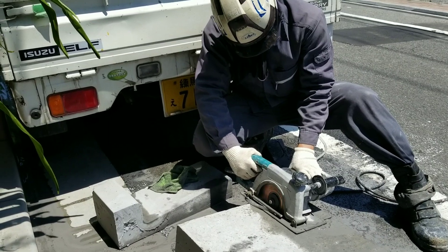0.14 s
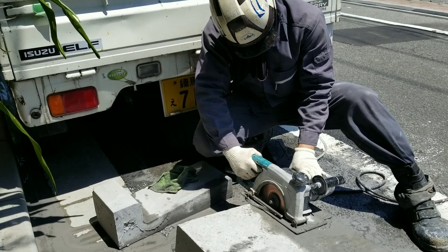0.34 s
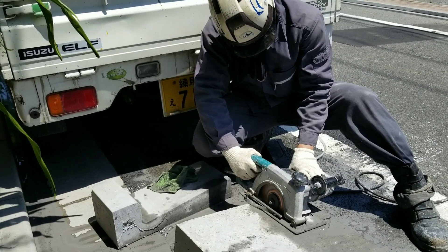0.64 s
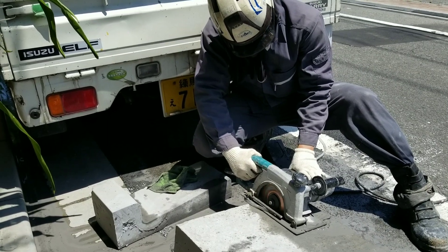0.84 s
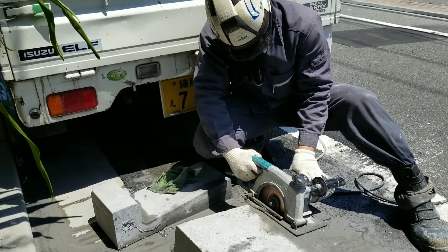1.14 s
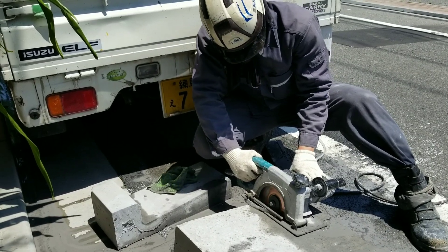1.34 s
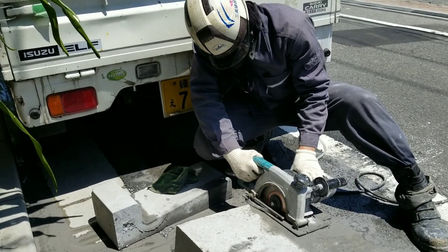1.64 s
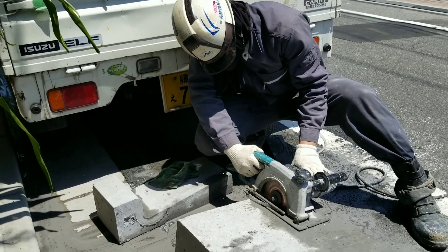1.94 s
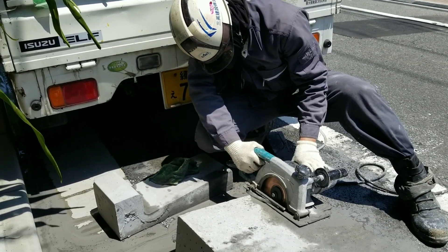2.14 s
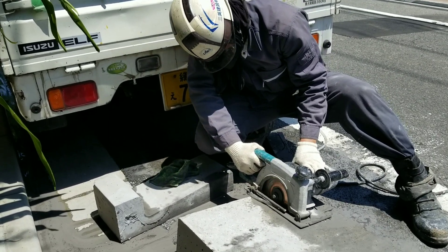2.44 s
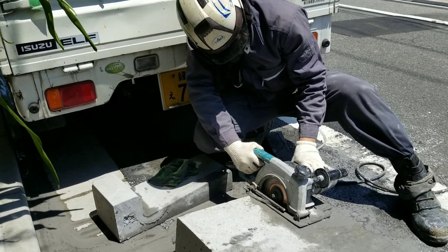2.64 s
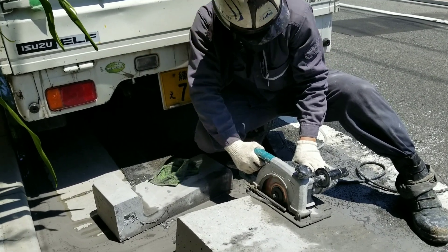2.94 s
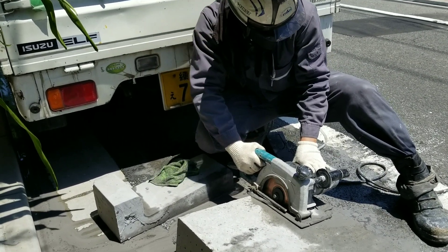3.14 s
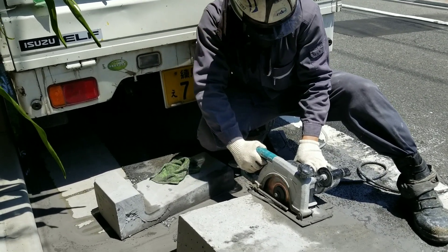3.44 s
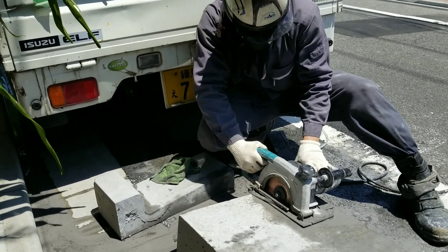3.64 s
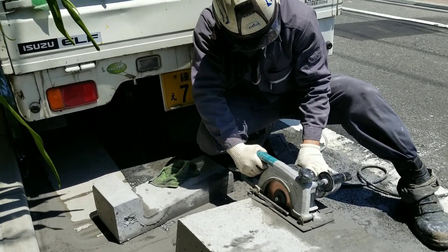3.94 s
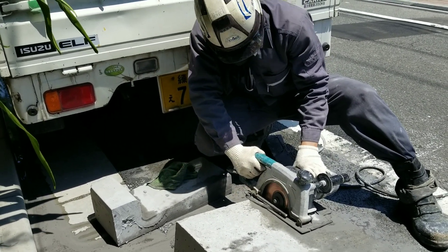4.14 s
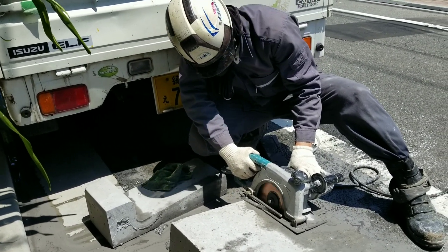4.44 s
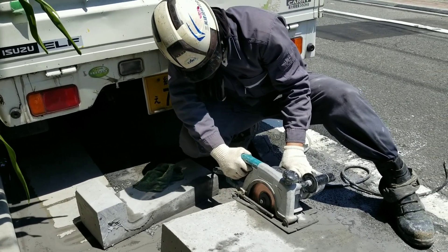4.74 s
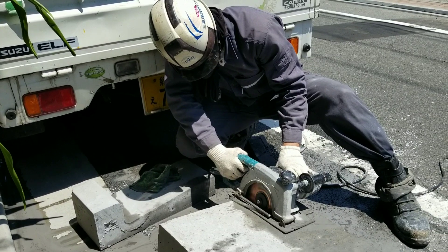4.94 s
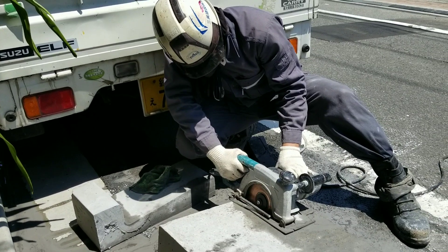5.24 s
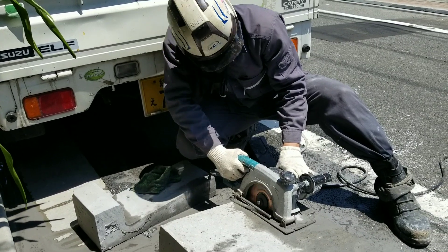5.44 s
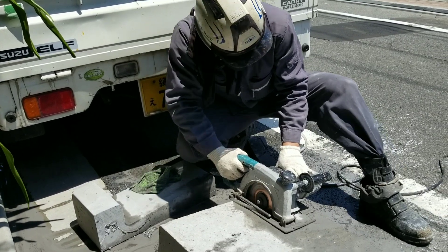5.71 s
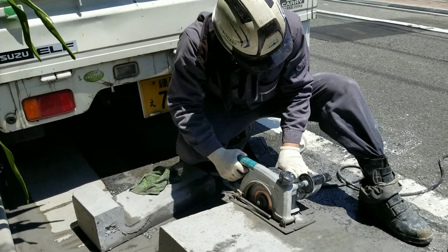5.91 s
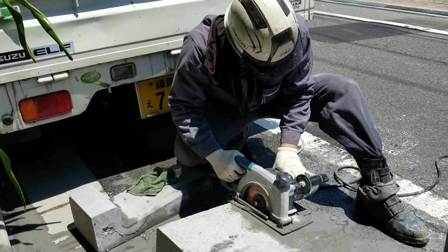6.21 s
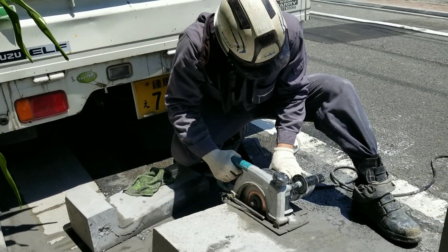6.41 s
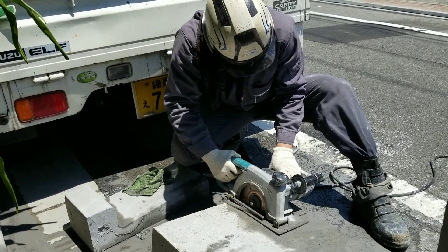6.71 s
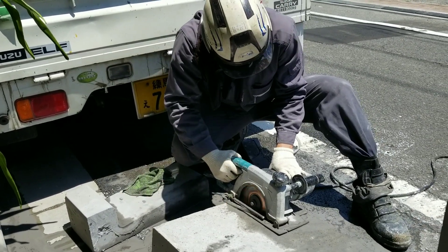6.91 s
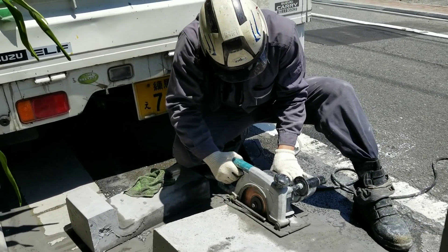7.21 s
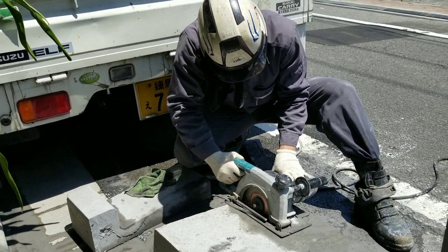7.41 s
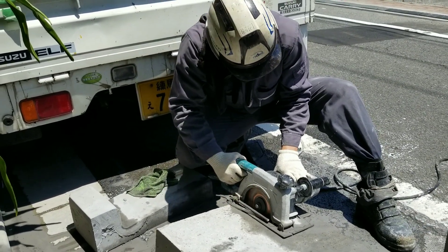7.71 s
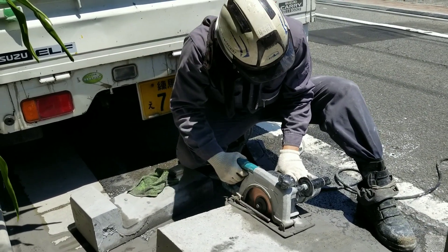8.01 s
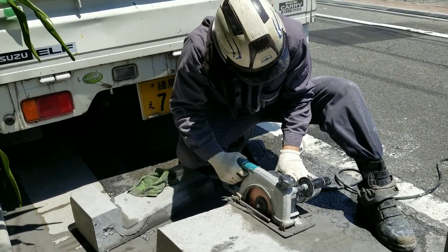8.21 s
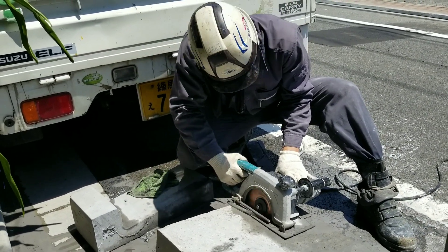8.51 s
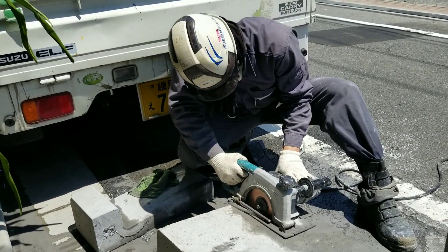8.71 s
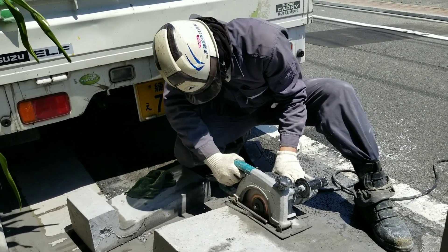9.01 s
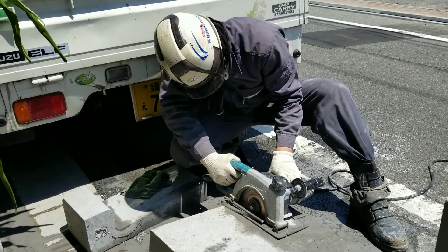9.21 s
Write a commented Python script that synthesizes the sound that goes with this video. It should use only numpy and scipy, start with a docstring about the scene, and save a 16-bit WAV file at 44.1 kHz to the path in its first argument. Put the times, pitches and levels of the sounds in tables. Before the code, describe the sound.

Close, harsh concrete cutting with a power saw: gritty grinding and gear whine dip as the trigger eases, then surge upward over generator chugging.

```python
"""By a road, a handheld electric saw grinds into a concrete block close to a two-port stereo microphone.
It cuts until 2.0 s; the trigger is eased, the motor sags, then pulls up again when pressed at 2.5 s.
Two short easings follow near 4.4 and 4.7 s, a longer one from 5.8 to 6.3 s, and the whine ends climbing.
Gears and fan whine with the speed, mains torque knocks the gears, and rim and rough noise ring guard and blade.
Behind, a small petrol generator fires into its exhaust and sags after each new press of the trigger."""
import sys
import numpy as np
from scipy import signal
from scipy.fft import rfft, irfft, next_fast_len
from scipy.io import wavfile
from scipy.ndimage import uniform_filter1d

SR = 44100
rng = np.random.default_rng(int(sys.argv[2]) if len(sys.argv) > 2 else 0)


def wrap_up_sound(samples):
    """Save the sound to the file named by the first command line argument, as 16-bit audio."""
    columns = np.atleast_2d(samples).T
    # keep every value between -1 and 1, then stretch to whole-number steps
    tamed = np.clip(columns, -1, 1)
    steps = np.round(tamed * 32767).astype(np.int16)
    wavfile.write(sys.argv[1], SR, steps)


N = 412776
T = np.arange(N) / SR  # seconds

PINION_TEETH, WHEEL_TEETH, FAN_BLADES, SEGMENTS = 8, 49, 12, 16  # counts
TORQUE_HZ = 99.95  # torque peaks, two a mains cycle

# Saw motor, before lift and waver of the tone: start_s, mesh_pitch_hz, mesh_level_db
MOTOR_SPEED = [(0.0, 2163, -33), (0.8, 2008, -32), (1.2, 1966, -32), (2.0, 1916, -35), (2.06, 1762, -27),
               (2.14, 1610, -29), (2.28, 1345, -33), (2.38, 1150, -25), (2.42, 1105, -22),
               (2.47, 1076, -24), (2.49, 1107, -43), (2.54, 1310, -51), (2.65, 1490, -45),
               (2.75, 1615, -40), (2.9, 1775, -36), (3.1, 1925, -35), (3.35, 1985, -33), (3.7, 1914, -31),
               (3.9, 1914, -30), (4.05, 1966, -30), (4.2, 2080, -31), (4.32, 2195, -25), (4.43, 2085, -29),
               (4.58, 1770, -33), (4.7, 1760, -40), (4.76, 1680, -30), (4.86, 1580, -36), (4.93, 1790, -30),
               (5.03, 1968, -27), (5.2, 2205, -26), (5.3, 2099, -36), (5.45, 1900, -31), (5.68, 1850, -36),
               (5.81, 1600, -40), (6.03, 1308, -38), (6.07, 1295, -30), (6.22, 1190, -31),
               (6.34, 1083, -31), (6.38, 1245, -42), (6.5, 1742, -30), (6.62, 1945, -26), (6.69, 2045, -23),
               (6.86, 2237, -25), (6.95, 2295, -22), (7.05, 2335, -23), (7.12, 2290, -33), (7.3, 2080, -35),
               (7.5, 1980, -30), (7.62, 1948, -29), (7.75, 1930, -28), (7.88, 1968, -27), (8.0, 2056, -35),
               (8.15, 2205, -36), (8.28, 2360, -26), (8.42, 2475, -34), (8.6, 2588, -26), (8.72, 2635, -34),
               (8.9, 2695, -31), (9.36, 2780, -35)]
# Lean of grinding and grit across the ports, used about its mean: start_s, left_minus_right_db
STEREO_LEAN = [(0.0, 11.5), (2.8, 9.5), (4.8, 11.5), (6.3, 10.5), (6.6, 11), (9.36, 12.5)]


def saw():
    """Motor speed turns the gears and blade; mains torque and the blade's high spot drive the noises."""
    mesh_hz, mesh_db = curves(MOTOR_SPEED)
    tones_db = tones(mesh_hz, mesh_db)
    rattle_db, guard_db, grind_db, hiss_db = pressure()
    lean_db, = curves(STEREO_LEAN)
    mesh = np.cumsum(mesh_hz) / SR
    turns = spin(mesh)

    # the slower the blade, the harder it catches as the high spot comes round
    catch = np.clip(1.1 - mesh_hz / 2400, .1, 1)
    high_spot = np.cos(2 * np.pi * turns) + 0.84 * np.cos(4 * np.pi * turns + 1.1)
    catch_db = catch * high_spot
    # the bowed disc bites the sides of the cut twice a turn
    bite = beat(2 * turns, 2.1, 3.1)
    flicker = undb(0.73 * walk(30))

    # each torque peak knocks the gear play shut, hardest under load
    torque = TORQUE_HZ * T + .22 + 0.027 * walk(40)
    knock = beat(torque, 4.2, 1.2)
    load = np.clip((rattle_db + 38) / 9, 0, 1)
    loaded_knock = load * knock
    # each blow gets a random sign, so the knocks rasp without a steady pitch
    blow_sign = rng.choice([-1, 1], int(torque[-1]) + 2)[torque.astype(int)]
    blows = load * blow_sign * clicks(torque, 1.2)
    # the gaps between the rim segments tick past, weaker under load
    rough = rim(turns, 0.907)
    scrape = rough + (3.0 - 1.5 * load) * clicks(SEGMENTS * turns, 3.0)

    rattle = gear_rattle(turns, flicker, load, loaded_knock, blows, rough) * undb(rattle_db)
    guard = guard_noise(flicker, catch_db, loaded_knock, blows, scrape) * undb(guard_db)
    guard = guard + guard_sing(blows, scrape)
    grind = grinding(flicker, catch_db, bite, loaded_knock, blows, scrape) * undb(grind_db - 3.0)
    grind = grind + blade(rng.standard_normal(N) + 8.0 * blows + 1.2 * scrape) * undb(grind_db - 7.0)
    hiss = grit_hiss(high_spot, bite, loaded_knock) * undb(hiss_db)
    lean = (lean_db - lean_db.mean()) * np.array([[.3], [-.7]])
    return rattle + guard + (grind + hiss) * undb(lean) + whine(mesh, mesh_hz, *tones_db)


def whine(mesh, mesh_hz, mesh_db, octave_db, fan_db, hum_db):
    """Gear mesh and octave throb with the blade turn; fan blades and armature hum run beside them."""
    armature = 2 * np.pi * mesh / PINION_TEETH
    turn = 2 * np.pi * spin(mesh)
    # the faster the gears, the more unevenly the teeth meet, and part of the tone spreads into a rough band
    uneven = (mesh_hz.clip(None, 2250) / 2200) ** 2
    random_wobble = .3 * walk(200) + .4 * walk(45)
    turn_wobble = .3 * np.sin(turn + 1.5) + .55 * np.sin(2 * turn)
    wobble = uneven * (random_wobble + turn_wobble)  # radians
    # the teeth press hardest while the high spot of the blade is in the cut, more so when slow
    throb_depth_db = (12.5 - mesh_hz / 190).clip(1)
    throb = undb(throb_depth_db * np.cos(turn) + .8 * walk(60))
    # the pinion runs out of true, which sets strands beside the mesh tone
    throb = throb * (1 + .3 * uneven * walk(400) + .55 * uneven * np.cos(armature))
    # hold the running rms at 1
    throb = throb / np.sqrt(uniform_filter1d(throb ** 2, size=SR // 4))

    # (cycles per armature turn, level, swell, phase drift)
    voices = [(PINION_TEETH, mesh_db, throb, wobble), (2 * PINION_TEETH, octave_db, throb, wobble),
              (FAN_BLADES, fan_db, 1, 0.49 * wobble), (1, hum_db, 1, 0)]
    out = 0
    for order, db, swell, drift in voices:
        tone = np.sqrt(2) * np.sin(order * armature + drift)
        out = out + undb(db) * panned(mesh_hz * order / PINION_TEETH) * swell * tone
    return out


# Octave of the mesh tone, before waver: start_s, level_db
OCTAVE_LEVEL = [(0.0, -46), (2.0, -47), (2.08, -39), (2.2, -35), (2.34, -33), (2.42, -27), (2.47, -30),
                (2.54, -46), (3.3, -43), (3.6, -47), (6.0, -46), (6.15, -43), (6.33, -37), (6.42, -47),
                (6.66, -45), (6.8, -36), (6.95, -40), (7.1, -47), (9.36, -50)]
GUARD_LIFT_HZ, GUARD_LIFT_WIDTH_HZ, GUARD_LIFT_DB = 1086, 14, 2  # a mesh tone passing here is lifted
COWL_HZ, COWL_WIDTH_HZ = 2330, 520  # the cowl favours the fan tone here
FAN_DB, FAN_SURGE_DB = -41, 11
HUM_DB, HUM_DB_PER_KHZ, HUM_REFERENCE_HZ = -55, 8, 2000  # HUM_DB holds at this mesh rate
TONE_WAVER_DB = 1.8


def tones(mesh_hz, mesh_db):
    """Levels of mesh tone, octave, fan and hum: the fan sings on restart, the hum grows with speed."""
    khz_above = (mesh_hz - HUM_REFERENCE_HZ) / 1000
    off_guard = 2 * (mesh_hz - GUARD_LIFT_HZ) / GUARD_LIFT_WIDTH_HZ
    lift_db = GUARD_LIFT_DB / (1 + off_guard ** 2)
    sag_hz = trigger()[1]
    fan_hz = mesh_hz * FAN_BLADES / PINION_TEETH
    off_cowl = 2 * (fan_hz - COWL_HZ) / COWL_WIDTH_HZ
    surge = np.clip(sag_hz, 0, 1) / (1 + off_cowl ** 4)
    levels = (mesh_db + lift_db, curves(OCTAVE_LEVEL)[0],
              FAN_DB + FAN_SURGE_DB * surge, HUM_DB + HUM_DB_PER_KHZ * khz_above.clip(None, .1))
    return [db + TONE_WAVER_DB * walk(17) for db in levels]


# Pan of tones from the saw: pitch_hz, left_db, right_db
SAW_TONE_PAN = [(300, 2, 2), (1102.6, 1.5, 4.5), (2150, 7, -13), (3050, 9, -12), (3260, -4, -16),
                (3750, 4, -12), (4100, 7, -9)]


def panned(hz):
    """Left and right gain of a tone, set by its pitch."""
    at, *pan_db = np.transpose(SAW_TONE_PAN)
    return undb([np.interp(hz, at, p) for p in pan_db])


# Moments when the high spot of the slowed blade is in the cut: time_s
HIGH_SPOT_TIMES = [2.422, 6.283]


def spin(mesh):
    """Blade turns through the gear ratio, nudged so that the high spot meets the cut at the given times."""
    turns = mesh / WHEEL_TEETH
    at = np.interp(HIGH_SPOT_TIMES, T, turns)
    return turns + 1 + np.interp(T, HIGH_SPOT_TIMES, np.round(at) - at)


# Cutting noises before flutter, coasting and trims (rattle as with the trigger held):
# start_s, rattle_level_db, guard_level_db, grinding_level_db, grit_level_db
CUT_LEVELS = [(0.0, -33, -31, -18.5, -25.5), (0.5, -29, -29, -19, -24), (1.0, -31, -28, -19.5, -24.5),
              (1.1, -26.5, -28.5, -20, -26), (1.95, -28, -26, -18, -22), (2.4, -30.5, -28, -19.5, -23),
              (2.52, -27.5, -26.5, -18, -21.5), (2.6, -24, -23.5, -19.5, -23),
              (2.82, -29.5, -28, -18.5, -23), (2.92, -32, -29, -17.5, -22), (3.02, -29.5, -28, -17, -22),
              (3.16, -31.5, -29, -18.5, -22), (3.6, -27, -28.5, -19.5, -23.5), (4.25, -32, -29, -19, -25),
              (4.5, -39, -35, -20.5, -26.5), (4.62, -33, -29, -20, -27), (4.95, -34, -31.5, -19.5, -26.5),
              (5.78, -35.5, -30, -21.5, -28), (6.3, -38.5, -36, -27.5, -34.5), (6.37, -29, -29, -23, -30),
              (6.51, -31.5, -26.5, -19, -27), (6.65, -34, -28.5, -19.5, -27.5),
              (6.93, -31, -27, -17.5, -25), (7.2, -28, -27, -19, -26.5), (7.43, -26.5, -28, -21.5, -29),
              (7.7, -28.5, -27, -21, -28.5), (8.05, -32.5, -30, -20, -27.5), (8.2, -35.5, -29, -19, -28),
              (9.36, -35, -32.5, -20.5, -28)]
COAST_RATTLE_DB, RATTLE_FLUTTER_DB = -5.5, .8
GUARD_FLUTTER = 0.33  # share of the rattle's flutter that the guard follows


def pressure():
    """Levels of rattle, guard, grinding and grit; the rattle flutters and dies down while the motor coasts."""
    rattle_db, guard_db, grind_db, hiss_db = curves(CUT_LEVELS)
    flutter_db = RATTLE_FLUTTER_DB * walk(16)
    rattle_db = rattle_db + COAST_RATTLE_DB * trigger()[0] + flutter_db
    return rattle_db, guard_db + GUARD_FLUTTER * flutter_db, grind_db, hiss_db


# Gear rattle at the two ports, relative levels: pitch_hz, left_db, right_db, likeness (0-1)
RATTLE_COLOUR = [(365, -36, -30.5, 1), (475, -15.5, -13.5, 0.99), (605, -2, 0, 1), (780, -2.5, 0.5, 0.61),
                 (957, -8, -14, 1), (1129, -19, -8, 0.64)]


def gear_rattle(turns, flicker, load, loaded_knock, blows, rough):
    """Loose gears chatter twice a blade turn; under load the noise bunches into torque knocks."""
    chatter = undb(2.8 * np.cos(4 * np.pi * turns))
    knocking = 1 - .65 * load + 1.3 * loaded_knock
    return gated(flicker * chatter * knocking, RATTLE_COLOUR, 14.0 * blows + .6 * rough)


# Blade guard at the two ports, relative levels: pitch_hz, left_db, right_db, likeness (0-1)
GUARD_COLOUR = [(888, -12.5, -9, 0.98), (937, -15, -14, 0.83), (1088, -1.5, -1.5, 0.92), (1090, -4.5, 0, 1),
                (1114, -2, -5.5, 0.54), (1163, -2.5, -2, 0.61), (1380, -4, -3.5, 0.21),
                (1510, -7.5, -13, 0.35), (1720, -20, -35, .6)]


def guard_noise(flicker, catch_db, loaded_knock, blows, scrape):
    """Gear blows and rim scrape shake the guard, swelling as the blade catches."""
    gate = flicker * undb(4.1 * catch_db) * (1 + 0.38 * loaded_knock)
    return gated(gate, GUARD_COLOUR, 14.0 * blows + 0.64 * scrape)


# The guard's own pitch: start_s, level_db
SING_LEVEL = [(0.0, -52), (1.0, -46), (2.0, -31.5), (2.53, -29), (2.58, -28), (2.86, -26), (2.92, -32.5),
              (3.5, -32.5), (3.7, -51), (5.6, -41.5), (6.3, -48), (6.5, -42), (7.5, -43), (9.36, -45)]
SING_HZ, SING_WIDTH_HZ = 1072, 40


def guard_sing(blows, scrape):
    """Noise, blows and scrape excite the guard's own pitch through two resonances, one wider."""
    push = rng.standard_normal(N) + 10.0 * blows + scrape
    sing = ring(ring(push, SING_HZ, SING_WIDTH_HZ), SING_HZ, 2.3 * SING_WIDTH_HZ)
    return unit(panned([SING_HZ]) * sing) * undb(curves(SING_LEVEL)[0])


# Grinding at the two ports, relative levels: pitch_hz, left_db, right_db, likeness (0-1)
GRIND_COLOUR = [(1373, -5, -51, 0.76), (1664, -7, -14, 0.35), (1830, -1, -16, 0.27), (2160, 1, -15, 0.42),
                (2270, -4, -22, 0.41), (3095, -4.5, -14.5, 0.43), (3160, -14.5, -22, 0.17),
                (3780, -10, -12, 0.3), (4620, -6.5, -17, 1), (5593, -19, -10.5, 0.84),
                (6120, -17.5, -27, 1), (7180, -11.5, -12.5, 0.043), (8880, -22, -23.5, 0.021),
                (10480, -17.5, -10.5, 0.046)]


def grinding(flicker, catch_db, bite, loaded_knock, blows, scrape):
    """Broad noise of rim on concrete, swelling with each catch and bite of the blade."""
    gate = flicker * undb(2.5 * catch_db) * (1 + 0.53 * bite) * (1 + 0.16 * loaded_knock)
    return gated(gate, GRIND_COLOUR, 4.5 * blows + 0.33 * scrape)


# Resonances of the steel disc, relative levels before pan: pitch_hz, width_hz, level_db
BLADE_MODES = [(1374, 35, -1.5), (1664, 43, -1), (1896, 58, 1), (2124, 10, 2.5), (2215, 20, 4),
               (2323, 51, 1.5), (2390, 27, -22), (2990, 38, -14), (3800, 32, -28), (4570, 40, -5),
               (4796, 31, -5.5)]


def blade(push):
    """The steel disc rings at its own pitches."""
    return unit(sum(undb(db) * panned([hz]) * ring(push, hz, width) for hz, width, db in BLADE_MODES))


# Grit hiss at the two ports, relative levels: pitch_hz, left_db, right_db, likeness (0-1)
HISS_COLOUR = [(8040, -57, -54, 0.23), (9300, -9.5, -57, 0.1), (11360, 1.5, -10, 0.16),
               (11990, -2, 5, 0.13), (12970, 7, -14, 0.29), (13600, -2, -28, 0.28), (14300, 3, -1, 0.12),
               (15380, -27, -1, 0.29)]


def grit_hiss(high_spot, bite, loaded_knock):
    """Grit flies off as noise with random spikes, swelling with the high spot and the bite."""
    spray = undb(0.98 * rng.exponential(1, N) + 1.0 * walk(200) + 0.21 * high_spot)
    return gated(spray * (1 + 0.5 * bite) * (1 + 0.43 * loaded_knock), HISS_COLOUR)


def rim(turns, keep, size=512):
    """Roughness of the blade rim: nearly the same scrape comes round each turn, wearing slowly."""
    keep = np.clip(keep, 0, .99)
    fresh = rng.standard_normal((int(turns[-1]) + 40, size))
    rows = signal.lfilter([np.sqrt(1 - keep ** 2)], [1, -keep], fresh, axis=0)[30:]
    return np.interp(turns * size, np.arange(rows.size), rows.ravel())


# Easings of the trigger and the generator's dip after the press: eased_s, pressed_s, sag_hz
TRIGGER_EASINGS = [(2.019, 2.504, 4.7), (4.439, 4.546, 0.31), (4.725, 4.853, 4.28), (5.827, 6.336, 5.9)]
FINGER_S, PICKUP_S = 0.0445, 0.022  # ramp of the easing; it is fully over this long after the press
SAG_S, RECOVER_S, CREST_S, SETTLE_S = 0.117, 0.33, 0.105, 0.558  # successive steps of the governor
OVERSHOOT = .22  # share of the sag


def trigger():
    """How far the trigger is eased (0-1), and how far the generator sags (Hz) after each new press."""
    eased, sag_hz = 0, 0
    steps = np.cumsum([0, SAG_S, RECOVER_S, CREST_S, SETTLE_S])
    for off, on, hz in TRIGGER_EASINGS:
        letting_go = np.clip((T - off) / FINGER_S, 0, 1)
        still_eased = np.clip((on + PICKUP_S - T) / FINGER_S, 0, 1)
        eased = eased + letting_go * still_eased
        sag_hz = sag_hz + hz * np.interp(T - on, steps, [0, 1, 0, -OVERSHOOT, 0])
    return eased, sag_hz


# Generator, before a slow flutter: start_s, exhaust_level_db, lowest_resonance_level_db
ENGINE_LEVELS = [(0.0, -47, -54), (1.67, -46.5, -54), (1.9, -45, -49), (1.95, -44, -68), (2.06, -44, -44),
                 (2.27, -65, -55), (2.87, -38, -50), (2.94, -50, -63), (3.0, -52, -49), (3.26, -49, -46),
                 (3.86, -45.5, -55), (4.4, -47.5, -45), (4.59, -60, -57), (4.67, -55, -52),
                 (4.82, -65, -58), (5.03, -43.5, -47), (6.02, -70, -57), (6.41, -62, -62),
                 (6.49, -43.5, -53), (6.72, -41, -47), (6.8, -44, -56), (6.88, -53, -42), (7.45, -47, -53),
                 (9.36, -45.5, -53)]
# Exhaust resonances, relative levels (two filters in a row, each twice this width):
# pitch_hz, width_hz, level_db, extra_db_per_hz_of_sag
EXHAUST_MODES = [(80, 12, -13, 4.5), (110, 7.8, -0.5, -3), (151.5, 14.6, 3.5, 0.5), (257, 42, -7.5, 0)]
BOOM_HZ, BOOM_WIDTH_HZ = 58.5, 24  # lowest resonance, two filters in a row
# Rumble at the two ports, relative levels: pitch_hz, left_db, right_db, likeness (0-1)
RUMBLE_COLOUR = [(22, -26, -24, .85), (40, -9, -8, 0.78), (55, -10, -8, 0.95), (100, -6.5, -7, 0.97),
                 (180, -9, -11.5, 1), (255, -0.5, -1.5, 1), (330, -5.5, -7, 1), (425, -14, -8, 1),
                 (600, -27, -25, 1)]
ENGINE_LAG = 13  # samples
ENGINE_HZ = 29.4  # governed firing rate


def generator():
    """A firing every second engine turn rings the exhaust, over loose rumble."""
    hz, rumble_db = governor()
    level_db, boom_db = curves(ENGINE_LEVELS)
    puffs = clicks(np.cumsum(hz) / SR, 0.45)
    labour_hz = (ENGINE_HZ - hz).clip(0, 4)
    pipe = 0
    for f, width, db, labour_db in EXHAUST_MODES:
        mode = ring(ring(puffs, f, 2 * width), f, 2 * width)
        pipe = pipe + undb(db + labour_db * labour_hz) * mode
    boom = ring(ring(puffs, BOOM_HZ, BOOM_WIDTH_HZ), BOOM_HZ, BOOM_WIDTH_HZ)
    pipe = undb(.8 * walk(6)) * (unit(pipe) * undb(level_db) + unit(boom) * undb(boom_db))
    # the engine stands to one side, so the left port hears it a little late
    pipe = np.array([np.roll(pipe, ENGINE_LAG), pipe])
    rumble = gated(undb(0.19 * walk(6)), RUMBLE_COLOUR)
    return pipe + rumble * undb(rumble_db)


UNLOADED_HZ = .9  # rise of the firing rate while the trigger is eased
THROTTLE_S = 0.13  # averaging time of the throttle
RUMBLE_DB, RUMBLE_UNLOADED_DB = -46, -5
RUMBLE_PER_RATTLE = 0.37  # dB per dB of rattle about its mean


def governor():
    """Firing rate and rumble level: light when the saw coasts, labouring when it restarts."""
    eased, sag_hz = trigger()
    smooth = uniform_filter1d(eased, max(int(THROTTLE_S * SR), 1))
    idle = np.interp(T - THROTTLE_S / 2, T, smooth)
    draw_db = curves(CUT_LEVELS)[0]
    draw_db = draw_db - draw_db.mean()
    hz = ENGINE_HZ + UNLOADED_HZ * idle - sag_hz + .1 * walk(1.5)
    return hz, RUMBLE_DB + RUMBLE_UNLOADED_DB * idle + RUMBLE_PER_RATTLE * draw_db


def undb(db):
    """Decibels to gain."""
    return 10 ** (np.asarray(db) / 20)


def unit(x):
    """Scale so that the mean of the channels has rms 1."""
    return x / np.sqrt(np.mean(np.atleast_2d(x).mean(axis=0) ** 2))


def curves(table):
    """Columns of a time table, one value a sample."""
    s, *columns = np.transpose(table)
    return [np.interp(T, s, c) for c in columns]


def walk(rate):
    """Random levels held 1 / rate s and slewed twice; spread near 1."""
    k = int(SR / rate)
    held = np.repeat(rng.standard_normal(N // k + 1), k)
    return 1.643 * uniform_filter1d(uniform_filter1d(held, k), k)[:N]


def ring(x, hz, width):
    """Two-pole resonance, gain 1 at the centre."""
    return signal.lfilter(*signal.iirpeak(hz, hz / width, fs=SR), x)


def cycle_sizes(cycles, scatter_db):
    """A random size for each cycle, held through it."""
    size = undb(scatter_db * rng.standard_normal(int(cycles[-1]) + 2))
    return size[cycles.astype(int)]


def beat(cycles, sharp, scatter_db):
    """One decaying burst a cycle, each of its own size."""
    return cycle_sizes(cycles, scatter_db) * np.exp(-sharp * (cycles % 1))


def clicks(cycles, scatter_db):
    """One click a cycle, each of its own size."""
    return cycle_sizes(cycles, scatter_db) * np.diff(np.floor(cycles), prepend=0).clip(0, 1)


def gated(gate, table, push=0):
    """Noise that follows a gate, with a push that the ports share as far as they are alike."""
    return colour(gate * (rng.standard_normal(N) + push), gate * rng.standard_normal(N), table)


LEFT_LAG_S = 4 / 44100  # the left port hears coloured noise this much later


def colour(shared, own, table):
    """Each microphone port hears its own colour; the right one shares only part of the left one's sound."""
    size = next_fast_len(N // 2) * 2
    hz = np.arange(size // 2 + 1) * SR / size + 1  # 1 Hz up, to keep the logarithm finite
    at, left_db, right_db, like = np.transpose(table)
    log_hz, log_at = np.log(hz), np.log(at)
    left, right = (causal(undb(np.interp(log_hz, log_at, db, left=-60, right=-60)), size)
                   for db in (left_db, right_db))
    like = np.clip(np.interp(log_hz, log_at, like), 0, 1)
    a, b = rfft(shared, size), rfft(own, size)
    lag = np.exp(-2j * np.pi * hz * LEFT_LAG_S)
    right_mix = like * a + np.sqrt(1 - like ** 2) * b
    return unit(irfft([left * lag * a, right * right_mix], size)[:, :N])


def causal(gain, size):
    """Minimum-phase response with this gain, which rings only after the blow."""
    cepstrum = irfft(np.log(gain), size)
    cepstrum[1:size // 2] *= 2
    cepstrum[size // 2 + 1:] = 0
    return np.exp(rfft(cepstrum))


def scene():
    """The saw close by, the generator behind."""
    return saw() + generator()


TOP_HZ = 16400  # upper limit of the recorder


def record(dry):
    """The recorder clips any peak beyond full scale and cuts the top."""
    low_pass = signal.ellip(12, .2, 90, TOP_HZ, fs=SR, output="sos")
    return signal.sosfilt(low_pass, np.clip(dry, -1, 1))


dry = scene()
out = record(dry)
wrap_up_sound(out)
```